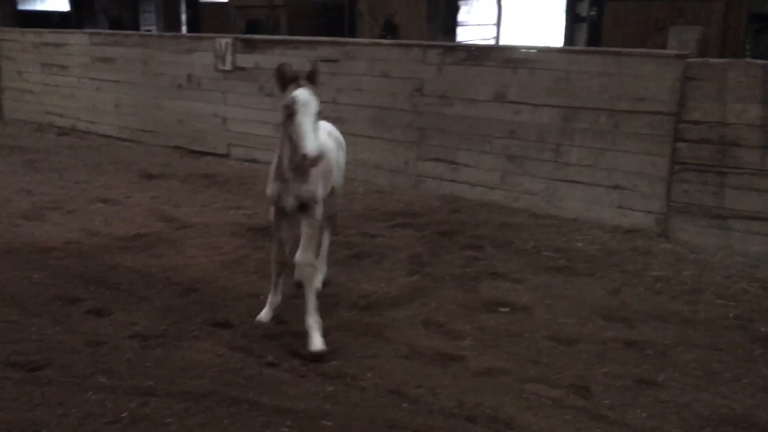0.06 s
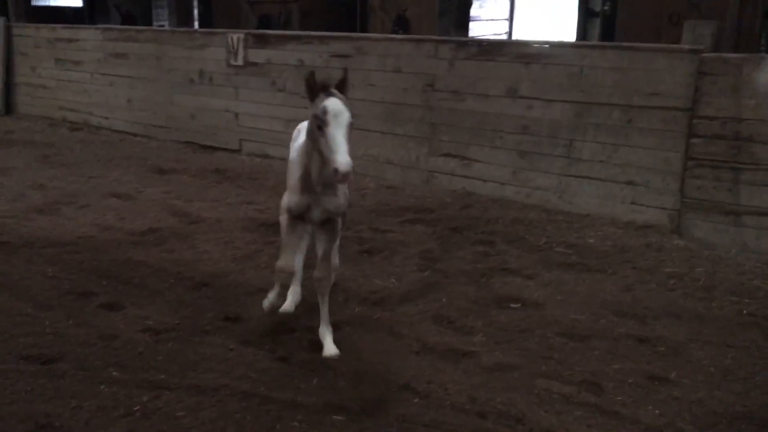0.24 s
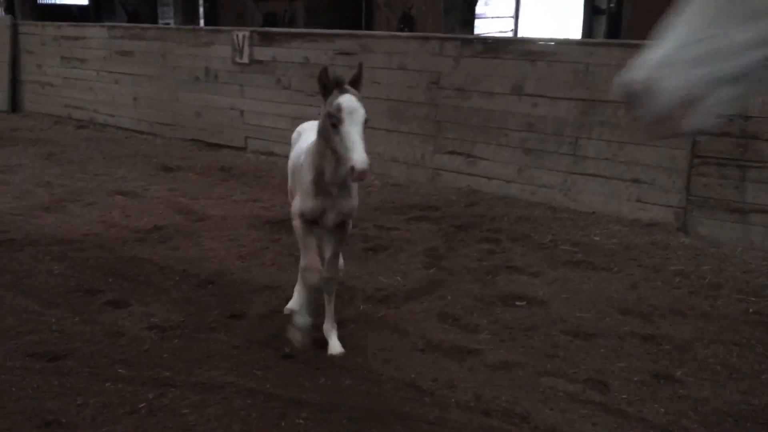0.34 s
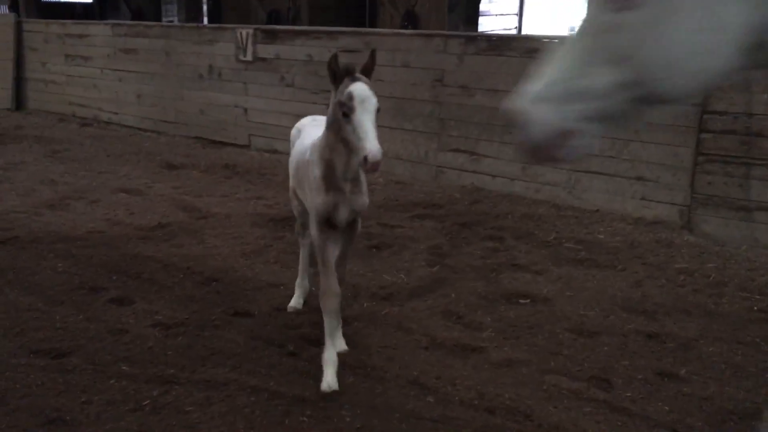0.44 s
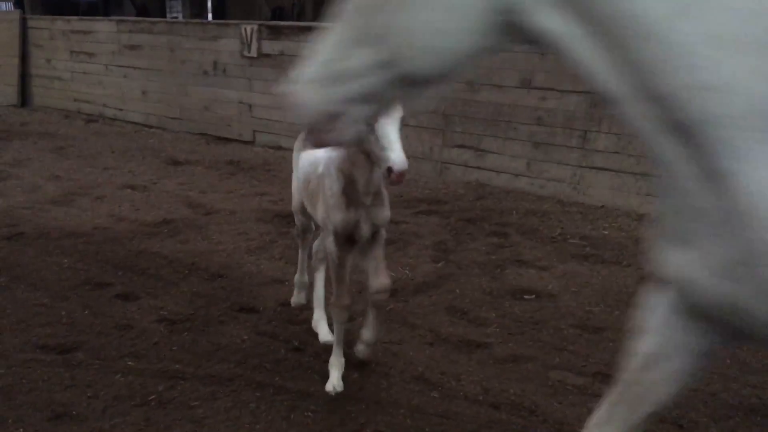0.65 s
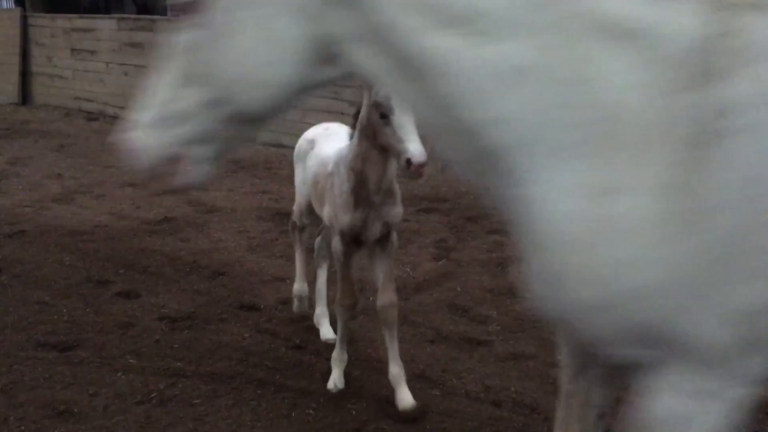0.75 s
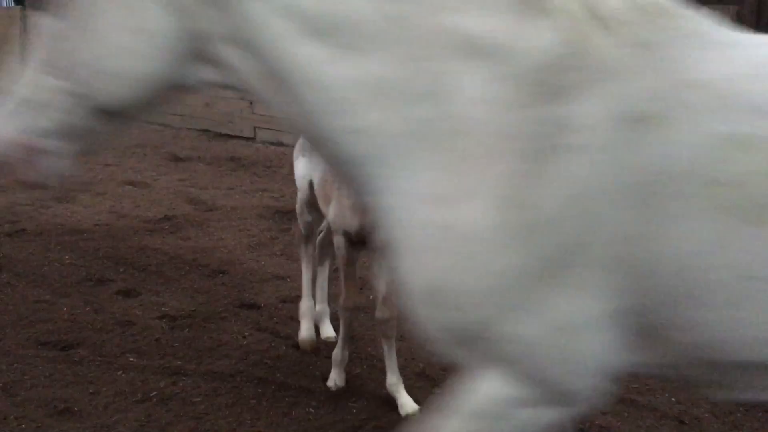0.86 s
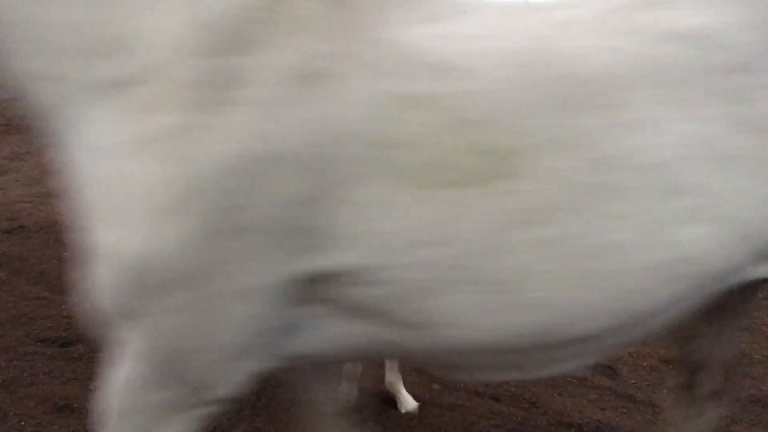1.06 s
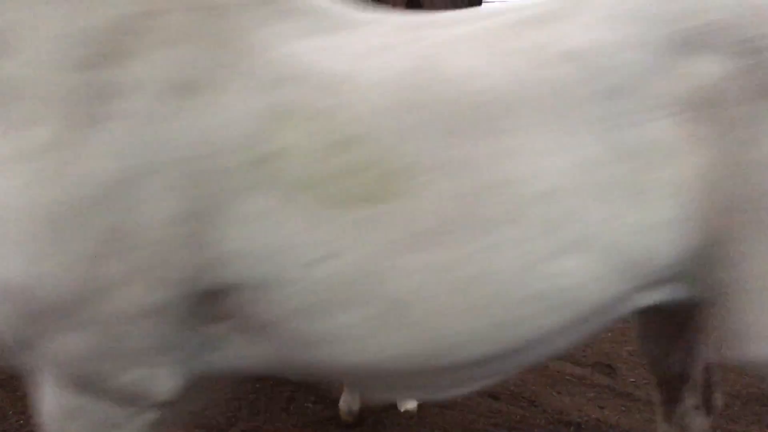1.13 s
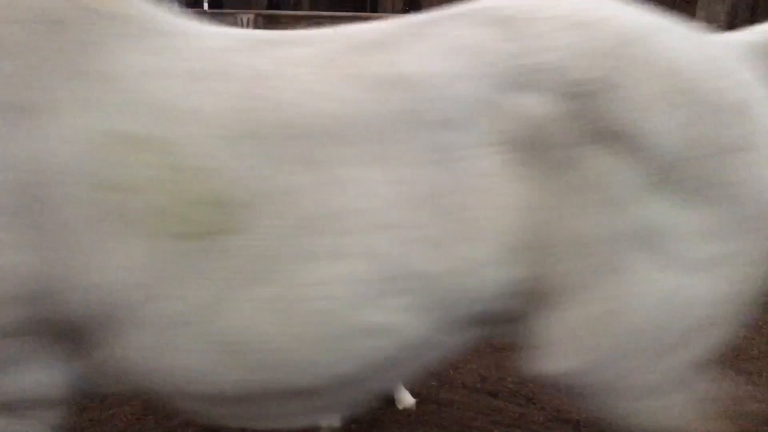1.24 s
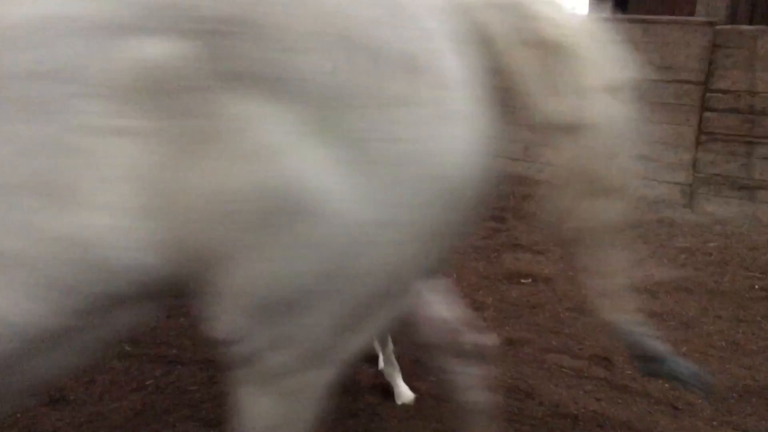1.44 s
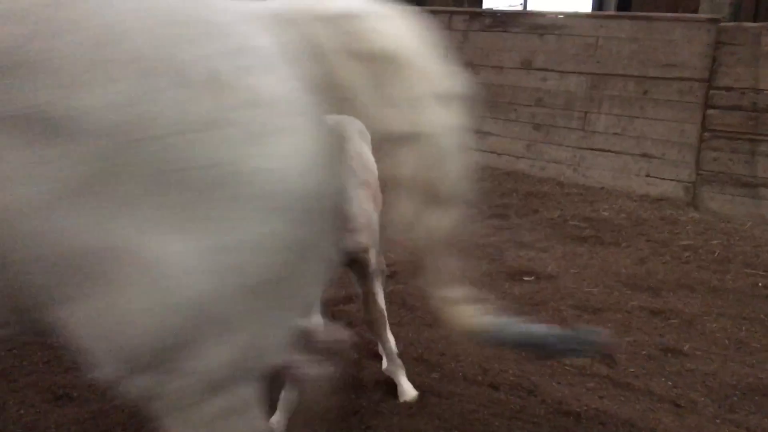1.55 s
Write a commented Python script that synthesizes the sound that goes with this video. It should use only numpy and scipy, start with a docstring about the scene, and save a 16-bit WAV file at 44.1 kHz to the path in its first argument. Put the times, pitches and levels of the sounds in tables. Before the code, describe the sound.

A horse nickers close by in an indoor arena. After a soft hoof thud at 0.1 seconds, the low, fluttering call starts at 0.2, breathy and nasal, grows hoarse, peaks around 0.6 and ends by 0.8 with a slight echo. A hoof thuds and scuffs in sand at 0.8, and fainter gritty steps follow near 1.2 and 1.5 seconds, over a faint low rumble.

```python
"""A hoof scuffs and thuds in sand, then a horse nickers close by in an indoor arena.
Slow, uneven throat pulses ring its long nose, each with a puff of air and a deep throb that turns hoarse.
More hooves push and slide in the footing, grit ticks, and the wooden hall answers over a low rumble."""
import sys
import numpy as np
from scipy import signal
from scipy.fft import rfft, irfft, next_fast_len
from scipy.io import wavfile
from scipy.ndimage import uniform_filter1d

SR = 44100
rng = np.random.default_rng(int(sys.argv[2]) if len(sys.argv) > 2 else 0)


def store_wav(level_fs):
    """Save 16-bit WAV to argv[1]."""
    pcm = np.round(np.clip(np.atleast_2d(level_fs), -1, 1) * 32767)
    wavfile.write(sys.argv[1], SR, pcm.T.astype(np.int16))


N = 70560

# Throat pulses. Each row: time in seconds, rate in Hz.
PULSE_RATE_HZ = [(.216, 90.5), (.3, 89.9), (.42, 85.7), (.48, 74.7), (.545, 81.7), (.58, 62.9), (.62, 90.7),
                 (.655, 77.6), (.69, 65.9), (.725, 83.1), (.775, 82.8), (.83, 46.8)]
# Nostril flutter, swelling the pulses in groups. Each row: time in seconds, rate in Hz.
FLUTTER_RATE_HZ = [(.22, 34), (.31, 36), (.385, 44), (.43, 38), (.5, 24), (.58, 24), (.63, 29), (.72, 22)]
# Call strength. Each row: time in seconds, deep throb in dB, nasal rattle in dB.
EFFORT_DB = [(0.215, -37.5, -47), (0.241, -32, -44.5), (0.278, -28.5, -39), (0.298, -25.5, -35.5),
             (0.409, -29.5, -37.5), (.45, -30.5, -41.5), (0.484, -28, -41.5), (.51, -25, -39),
             (.56, -20, -39), (.588, -25.5, -44), (0.607, -22.5, -36), (0.643, -19, -39.5),
             (.69, -26.5, -40), (0.718, -27, -42.5), (0.783, -28.5, -50), (.83, -62, -59)]
# Lowest resonance of throat and nose. Each row: frequency in Hz, relative level in dB.
THROB_SPECTRUM_DB = [(30, -25), (60, -10), (88, -5), (125, -1), (150, -.5), (180, -.5), (215, -2),
                     (250, -9), (300, -22), (420, -34), (800, -60), (2000, -90)]
# Nose and throat resonances. Each row: centre in Hz, width in Hz, relative level in dB.
NOSE_MODES = [(972, 178, 3.5), (1127, 207, -1.5), (1356, 280, -15), (1527, 140, 3), (1603, 55, -4.5)]
THROAT_MODES = [(377, 260, -1), (464, 130, 4), (619, 110, -1)]
# Hoarseness. Each row: time in seconds, growl's share of the throb's power from 0 to 1.
ROUGHNESS = [(.22, .02), (.37, .07), (.48, .36), (.6, .27), (.8, .28)]
# Hoarse growl. Each row: frequency in Hz, relative level in dB.
GROWL_SPECTRUM_DB = [(50, -25), (90, -8), (130, 0), (165, -5), (200, 1), (245, -7), (300, -20), (700, -45),
                     (2000, -90)]
# Air puffs. Each row: frequency in Hz, relative level in dB before and after the nostrils relax.
PUFF_SPECTRA_DB = [(302, 3, 6.5), (1890, -5, -4.5), (2814, -20, -10), (3073, 3.5, 9.5), (3350, -1, 0.5),
                   (3270, -0.5, 8.5), (3940, 1, -6), (4280, -12, -28), (4430, -7.5, -3.5), (4900, -15, -39),
                   (5280, -12, -6.5), (5930, -6.5, -11), (5990, -6.5, 3), (6850, -12.5, -9.5),
                   (9000, -3, -5.5), (10200, -22, -11), (12100, -9.5, -3.5), (15700, -14.5, -20)]
# Nostrils relaxing: start and end in seconds.
RELAX_SPAN_S = [0.3, .54]
# Air through the nose before the call. Each row: frequency in Hz, relative level in dB.
RUSH_SPECTRUM_DB = [(500, -16), (800, -6), (1050, 5.5), (1250, -6), (1500, -11), (1900, -14), (3500, -13.5),
                    (8000, -21.5)]
# Hoof thuds. Each row: start in seconds, level in dB, pitch in Hz.
HOOF_THUDS = [(0.132, -32.5, 55.5), (.575, -32, 54), (0.808, -36, 56), (1.19, -50.5, 52.4),
              (1.461, -40, 48), (1.565, -38.5, 70)]
# Hoof scuffs. Each row: start in seconds, nominal length in seconds, level in dB.
HOOF_SCUFFS = [(-.06, 0.18, -57), (0.811, 0.036, -45.5), (1.091, 0.047, -60), (1.149, 0.032, -53.5),
               (1.178, 0.047, -54), (1.456, 0.041, -57), (1.502, 0.053, -53.5), (1.55, 0.029, -56.5)]
# Sliding sand. Each row: frequency in Hz, relative level in dB.
SAND_SPECTRUM_DB = [(200, -3.5), (600, 8), (1500, 7.5), (3500, 3), (6000, 0.5), (10000, -3.5), (15500, -28)]
# Grit. Each row: start in seconds, relative energy in dB, brightest frequency in Hz.
GRIT_TICKS = [(0.1268, -11, 5450), (0.127, -21.5, 1200), (0.13, -27, 5050), (0.492, -28, 3480),
              (0.7956, -20, 3970), (0.8275, -39, 3380), (0.8334, -25.5, 3400), (0.833, -28, 1320),
              (.837, -30, 3420), (.846, -33, 3000), (0.858, -25.5, 2770), (.907, -31.5, 4060),
              (.9288, -28.5, 11800), (1.0261, -35.5, 9600), (1.0527, -39, 9900), (1.118, -31, 6700),
              (1.1526, -45, 3970), (1.156, -23.5, 3200), (1.191, -32, 3300), (1.2352, -34, 9800),
              (1.3662, -30.5, 8300), (1.5103, -22, 7000), (1.517, -28.5, 7900), (1.546, -28, 3070)]
# Hall decay. Each row: frequency in Hz, T60 in seconds.
HALL_T60_S = [(80, 1), (200, 0.78), (1000, 0.64), (4000, 1), (12000, 0.1)]
# Hall background. Each row: frequency in Hz, relative level in dB.
RUMBLE_SPECTRUM_DB = [(20, -31), (45, 4), (80, 1), (150, -7.5), (300, -13.5), (600, -26), (1200, -25),
                      (2500, -31), (5000, -36.5), (9000, -36.5), (15500, -46)]


def nicker(throat_db=-4, throb_flutter=.12, throat_flutter=.4, throb_scatter_db=1, rattle_scatter_db=1.3):
    """Throat pulses ring throat and nose and blow puffs of air; a deep throb follows each."""
    times_s, swell_db = throat_pulses()
    throb_scatter, nose_scatter, throat_scatter = rng.standard_normal((len(times_s), 3)).T
    effort_s, *efforts_db = np.transpose(EFFORT_DB)
    throb_db, rattle_db = (np.interp(times_s, effort_s, db) for db in efforts_db)
    throb_sizes = amp(throb_db + throb_flutter * swell_db + throb_scatter_db * throb_scatter)
    throat_sizes = amp(rattle_db + throat_flutter * swell_db + rattle_scatter_db * throat_scatter)
    nose_sizes = amp(rattle_db + swell_db + rattle_scatter_db * nose_scatter)
    throat = amp(throat_db) * ring(times_s, throat_sizes, airway(THROAT_MODES))
    nose = ring(times_s, nose_sizes, airway(NOSE_MODES))
    return hoarse(throb(times_s, throb_sizes)) + throat + nose + puffs(times_s, nose_sizes)


def throat_pulses(start_s=.2152, end_s=.835, jitter_s=.00025, crest_s=.2655, flutter_db=4.5):
    """Uneven pulse times, and the swell in dB that nostril flutter gives each."""
    t = np.arange(start_s, end_s, 1 / SR)
    pulse_cycles = np.cumsum(np.interp(t, *np.transpose(PULSE_RATE_HZ))) / SR
    flutter_cycles = np.cumsum(np.interp(t, *np.transpose(FLUTTER_RATE_HZ))) / SR
    times_s = np.interp(np.arange(int(pulse_cycles[-1]) + 1), pulse_cycles, t)
    turns = np.interp(times_s, t, flutter_cycles) - np.interp(crest_s, t, flutter_cycles)
    swell_db = flutter_db * np.cos(2 * np.pi * turns)
    return times_s + jitter_s * rng.standard_normal(len(times_s)), swell_db


def airway(modes, top_hz=1650):
    """Response of airway resonances, alternating in sign and steeply low-passed."""
    def response(f):
        peaks = sum((-1) ** i * amp(db) * resonance(f, hz, width_hz)
                    for i, (hz, width_hz, db) in enumerate(modes))
        return peaks * causal(1 / np.sqrt(1 + (f / top_hz) ** 16))
    return response


def throb(times_s, sizes, lag_s=.0062, centre_s=.05):
    """The lowest resonance answers each pulse with a rounded, symmetric throb."""
    def response(f):
        return amp(along(THROB_SPECTRUM_DB, f)) * np.exp(-2j * np.pi * f * centre_s)
    return ring(times_s + lag_s - centre_s, sizes, response)


def hoarse(tone):
    """Part of the throb breaks up into a turbulent growl of the same strength."""
    share = np.interp(since(0), *np.transpose(ROUGHNESS))
    tone_rms = np.sqrt(np.abs(uniform_filter1d(tone ** 2, size=700)))
    growl = noise(GROWL_SPECTRUM_DB)
    growl /= np.sqrt(np.abs(uniform_filter1d(growl ** 2, size=1800)) + 1e-9)
    return np.sqrt(1 - share) * tone + np.sqrt(share) * tone_rms * growl


def puffs(times_s, sizes, gain_db=-12.5, puff_s=.0065, linger=.35, linger_s=.046):
    """Each pulse blows air through the nostrils; its colour shifts as they relax."""
    def outflow(f):
        return 1 / (1 + 2j * np.pi * f * puff_s) + linger / (1 + 2j * np.pi * f * linger_s)
    jet = ring(times_s, sizes, outflow) * rng.standard_normal(N)
    spectra = np.array(PUFF_SPECTRA_DB)
    early = filtered(jet, lambda f: causal(unit(amp(along(spectra[:, [0, 1]], f)))))
    late = filtered(jet, lambda f: causal(unit(amp(along(spectra[:, [0, 2]], f)))))
    relaxed = np.interp(since(0), RELAX_SPAN_S, [0, 1])
    return amp(gain_db) * ((1 - relaxed) * early + relaxed * late)


def nose_rush(level_db=-54, hold_s=.13, fade_s=.086):
    """Faint air through the nose, fading as the call nears."""
    return amp(level_db) * np.exp(-since(hold_s) / fade_s) * noise(RUSH_SPECTRUM_DB)


def thuds(rise_s=.0028, t60_s=.27):
    """Each hoof gives the soft ground one low, damped push."""
    out = np.zeros(N)
    for start_s, db, hz in HOOF_THUDS:
        t = since(start_s)
        envelope = amp(db - 60 * t / t60_s) * (1 - np.exp(-t / rise_s))
        out -= envelope * np.sin(2 * np.pi * hz * t)
    return out


def scuffs(clump_db=4, rise_share=.36, grains_per_s=260, crunch_db=-6.5):
    """Sand slides under a hoof: clumped hiss and crunching grains swell quickly and die away."""
    swell = np.zeros(N)
    for start_s, length_s, db in HOOF_SCUFFS:
        age = since(start_s) / (length_s * rise_share)
        swell += amp(db) * age * np.exp(1 - age)
    clumps = amp(clump_db * unit(uniform_filter1d(rng.standard_normal(N), size=24)))
    grains = (rng.random(N) < grains_per_s / SR) * rng.standard_normal(N)

    def grain_response(f):
        return causal(amp(along(SAND_SPECTRUM_DB, f))) * resonance(f, hz=3470, width_hz=2400)
    crunch = unit(filtered(grains, grain_response))
    hiss = unit(clumps * noise(SAND_SPECTRUM_DB))
    return swell * (hiss + amp(crunch_db) * crunch)


def ticks(gain_db=2.5, crack_t60_s=.0016, crumble_db=-21, crumble_t60_s=.02):
    """Grit snaps with a sharp crack and a brief crumble."""
    out = np.zeros(N)
    for start_s, db, hz in GRIT_TICKS:
        t = since(start_s)
        envelope = amp(-60 * t / crack_t60_s) + amp(crumble_db - 60 * t / crumble_t60_s)
        burst = rng.standard_normal(N) * (t > 0) * envelope
        tick = filtered(burst, lambda f: resonance(f, hz, width_hz=hz) ** 2)
        out += amp(db + gain_db) * tick / np.linalg.norm(tick)
    return out


def walls(x, first_s=.004, last_s=.049, count=30, low_cut_hz=300):
    """Early echoes from the ground and the boards, which soak up the bass."""
    delays_s = rng.uniform(first_s, last_s, count)
    signs = (-1) ** np.arange(count)
    echoes = np.bincount(np.round(delays_s * SR).astype(int), signs) / np.sqrt(count)
    return filtered(signal.fftconvolve(x, echoes)[:N], lambda f: 1j * f / (low_cut_hz + 1j * f))


def hall(x, predelay_s=.02):
    """The arena's tail; the top treble dies first."""
    hz, t, spectra = signal.stft(rng.standard_normal(SR), SR, nperseg=256)
    t60_s = along(HALL_T60_S, hz)[:, None]
    _, tail = signal.istft(spectra * amp(-60 * t / t60_s) / np.sqrt(t60_s), SR, nperseg=256)
    delayed = np.pad(x, (round(predelay_s * SR), 0))
    return signal.fftconvolve(delayed, tail / np.linalg.norm(tail))[:N]


def rumble(level_db=-49.5):
    """The hall's steady low background."""
    return amp(level_db) * noise(RUMBLE_SPECTRUM_DB)


def ring(times_s, sizes, response):
    """Pulses through a body; size 1 at the mean pulse rate gives about rms 1."""
    impulse = filtered(signal.unit_impulse(N), response)
    impulse *= np.sqrt(SR * np.mean(np.diff(times_s))) / np.linalg.norm(impulse)
    pulses = np.bincount(np.round(times_s * SR).astype(int), sizes, N)
    return signal.fftconvolve(pulses, impulse)[:N]


def resonance(f, hz, width_hz):
    """Response of one resonance."""
    return 1j * f * width_hz / (hz * hz - f * f + 1j * f * width_hz)


def causal(gain):
    """Minimum-phase response with this gain."""
    cepstrum = irfft(np.log(np.maximum(gain, 1e-6)))
    half = len(cepstrum) // 2
    return np.exp(rfft(np.concatenate([cepstrum[:1], 2 * cepstrum[1:half], np.zeros(half)])))


def filtered(x, response):
    """x through a complex frequency response."""
    size = 2 * next_fast_len(N)
    return irfft(rfft(x, size) * response(np.fft.rfftfreq(size, 1 / SR)), size)[:N]


def noise(spectrum_db):
    """Coloured noise of rms 1."""
    return unit(filtered(rng.standard_normal(N), lambda f: amp(along(spectrum_db, f))))


def along(points, hz):
    """Interpolate (Hz, value) points on a log axis."""
    points_hz, values = np.transpose(points)
    return np.interp(np.log(hz + 1), np.log(points_hz + 1), values)


def since(start_s):
    """Seconds since start_s, zero before it."""
    return np.maximum(np.arange(N) / SR - start_s, 0)


def amp(db):
    """Decibels to gain."""
    return 10 ** (np.asarray(db) / 20)


def unit(x):
    """Scale to rms 1."""
    return x / np.sqrt(np.mean(x ** 2) + 1e-20)


def scene(call_hall_db=-11, grit_hall_db=-14, walls_db=-7):
    """The call and the steps in the hall, mono."""
    call = nicker()
    grit = scuffs() + ticks()
    tail = hall(amp(call_hall_db) * call + amp(grit_hall_db) * grit)
    echoes = amp(walls_db) * walls(call)
    return (call + nose_rush() + grit + thuds() + echoes + tail + rumble())[None]


def record(dry):
    """Band limit at 16 kHz."""
    return np.array([filtered(dry[0], lambda f: f < 16000)])


dry = scene()
out = record(dry)
store_wav(out)
```